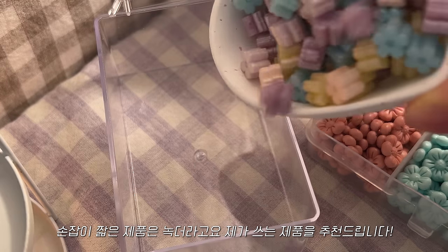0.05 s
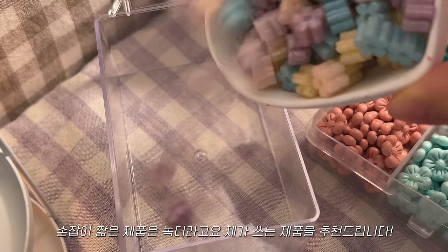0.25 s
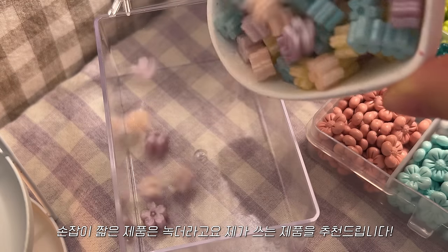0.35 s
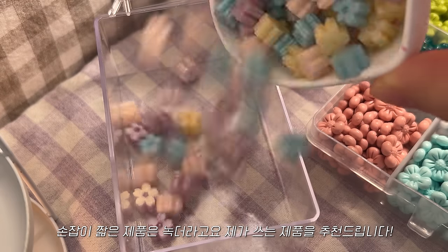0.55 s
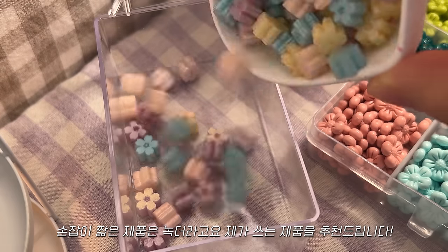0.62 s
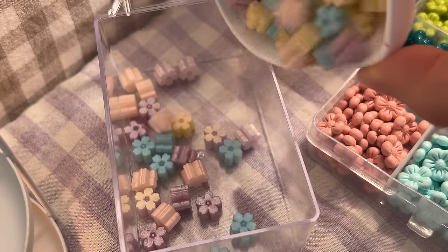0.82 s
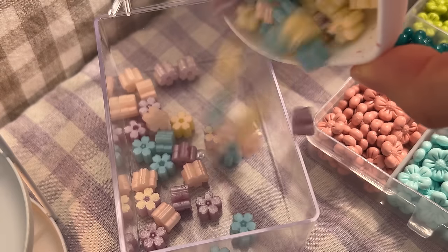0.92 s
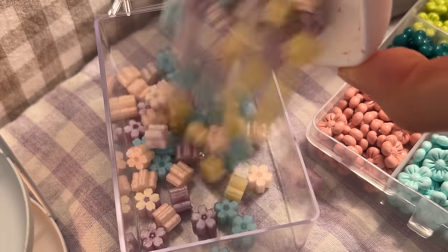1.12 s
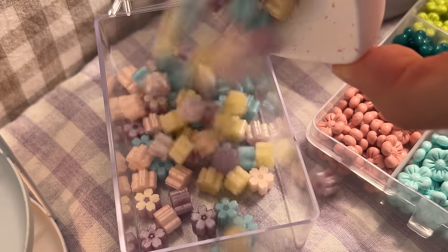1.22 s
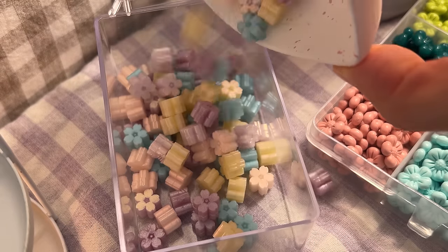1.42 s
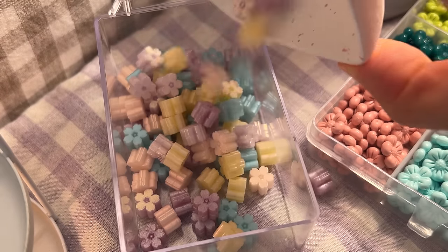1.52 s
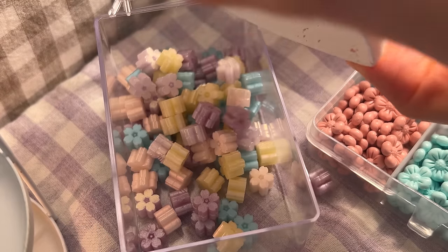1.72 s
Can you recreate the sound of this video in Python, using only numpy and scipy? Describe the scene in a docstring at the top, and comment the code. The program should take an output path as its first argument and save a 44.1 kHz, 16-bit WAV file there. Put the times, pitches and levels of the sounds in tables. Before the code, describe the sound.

Hard wax beads pour from a bowl into a plastic tray in two bursts, ticking against each other and making the tray ring briefly, until the last ones settle. The microphone is close and the room quiet.

```python
"""Small hard wax beads slip faintly in a tilting bowl, in a still room. At 0.2 s they pour into a thin
plastic tray on a cloth: some knock together in short bright ticks, others hit the bare tray and make it
ring. The heap jostles, the tray thuds softly on the cloth, and clumps flex its floor with hollow knocks.
A second pour follows at 0.9 s and thins out until the last beads settle.
A close pair of microphone ports hears it all."""
import sys
import numpy as np
from scipy import signal
from scipy.fft import rfft, irfft, next_fast_len
from scipy.io import wavfile
from scipy.ndimage import uniform_filter1d, minimum_filter1d

SR = 44100
rng = np.random.default_rng(int(sys.argv[2]) if len(sys.argv) > 2 else 0)


def transcribe(signal):
    """Save signal, clipped to [-1, 1], as a 16-bit WAV file at the path in sys.argv[1]."""
    frames = np.atleast_2d(signal).T
    limited = np.clip(frames, -1, 1)
    pcm = np.round(limited * 32767).astype(np.int16)
    wavfile.write(sys.argv[1], SR, pcm)


N = 77175
HIT_SAMPLES = 6144
HIT_T = np.arange(HIT_SAMPLES) / SR
POUR_START_S = .22


def from_db(db):
    """Decibels to gain."""
    return 10 ** (np.asarray(db) / 20)


def rms_one(x):
    """Scale to an rms of 1."""
    return x / np.sqrt(np.mean(x ** 2) + 1e-20)


def attack_one(x):
    """Scale the first few milliseconds to an rms of 1."""
    return x / np.sqrt(np.mean(x[:200] ** 2) + 1e-20)


def at_time(rows, s):
    """Read a curve at given times."""
    return np.interp(s, *np.transpose(rows))


def at_hz(rows, hz):
    """Read a curve on a log-frequency axis."""
    f, value = np.transpose(rows)
    return np.interp(np.log(hz + 1e-6), np.log(f), value)


def dying(t60):
    """Decay envelope that falls 60 dB in t60 seconds."""
    return from_db(-60 * HIT_T / t60)


def add(out, s, sound):
    """Mix a sound in at a given time."""
    i = int(np.clip(s * SR, 0, N - 1))
    out[..., i:i + sound.shape[-1]] += sound[..., :N - i]


def causal_response(curve):
    """Minimum-phase frequency response of an EQ curve."""
    cepstrum = irfft(np.log(from_db(at_hz(curve, np.fft.rfftfreq(HIT_SAMPLES, 1 / SR)))))
    cepstrum[1:HIT_SAMPLES // 2] *= 2
    cepstrum[HIT_SAMPLES // 2 + 1:] = 0
    return np.exp(rfft(cepstrum))


def ringing(hz, gain, t60):
    """Damped sines of random strength that build up within a cycle or two."""
    strength = gain * rng.random(len(hz)) * rng.choice([-1, 1], len(hz))
    cycles = np.outer(hz, HIT_T)
    decay = np.exp(-np.minimum(np.log(1000) / t60 * HIT_T, 20))
    rise = 1 - np.exp(-np.minimum(cycles, 10))
    return strength @ (np.sin(2 * np.pi * cycles) * decay * rise)


# Room tone EQ. Each row: frequency in Hz, relative gain in dB.
AIR_EQ = [(30, -21), (15000, -26)]


def air():
    """Faint noise of the still room."""
    colour = from_db(at_hz(AIR_EQ, np.fft.rfftfreq(N, 1 / SR)))
    return from_db(-73) * rms_one(irfft(rfft(rng.standard_normal((2, N))) * colour, N))


# Beads shifting in the bowl. Each row: start in seconds, level in dB.
BOWL_SHIFTS = [(.063, -46), (.09, -56), (.146, -46)]


def bowl_shifts(modes_hz=(2560, 4430), t60=.022, rustle_db=-65):
    """Beads slip in the tilting bowl with faint, dull clinks and a rustle of tiny ticks."""
    out = np.zeros(N)
    band = signal.butter(3, [2200, 4900], "band", fs=SR)
    slips = [(s, rustle_db + rng.normal(0, .84)) for s in rng.uniform(0, POUR_START_S, size=14)]
    for s, db in list(BOWL_SHIFTS) + slips:
        tick = attack_one(rng.standard_normal(HIT_SAMPLES) * dying(t60))
        ring = attack_one(ringing(modes_hz, 1, t60))
        add(out, s, from_db(db) * attack_one(signal.lfilter(*band, tick + .5 * ring)))
    return out


# EQ of a contact's crack. Each row: frequency in Hz, relative gain in dB.
CRACK_EQ = [(150, -27), (700, -21), (1150, -15), (1550, 1), (2500, 4), (3200, -6), (5000, -1.5), (7600, 0),
            (10000, -8.5), (12400, -16.5), (16000, -20.5)]
CRACK_RESPONSE = causal_response(CRACK_EQ)


def crack(t60=.011, snap_db=15.5, tumble_s=.0014):
    """A bead snaps down and touches twice more with other corners, over a duller noise tail."""
    burst = dying(t60 * np.exp(.46 * rng.uniform(-2.9, 3)))
    touches = rng.standard_normal((3, HIT_SAMPLES)) * burst
    touches[:, 0] = from_db(snap_db)
    tail = from_db(-17.5) * rng.standard_normal(HIT_SAMPLES) * dying(.091)
    force = touches[0] + signal.lfilter(*signal.butter(2, 5860, fs=SR), tail)
    for touch, lag in zip(touches[1:], np.cumsum(tumble_s * rng.uniform(.5, 2, 2))):
        force += from_db(-.5) * rng.random() * np.pad(touch, (int(lag * SR), 0))[:HIT_SAMPLES]
    return attack_one(irfft(rfft(force) * CRACK_RESPONSE))


# The tray's ringing modes. Each row: pitch in Hz, relative level in dB.
TRAY_MODES = [(1567, 0.5), (1721, -4), (2040, 1), (2296, -6), (2522, -3), (2785, -1.5), (4480, 7.5),
              (5750, -12.5), (6800, -7.5), (7690, -7)]
DETUNE = .011   # relative pitch scatter from hit to hit


def tray_ring(s, empty_t60_at_1khz=.2, damping_per_s=1):
    """The struck tray rings; high modes die sooner, and the growing heap damps them all."""
    mode_hz, mode_db = np.transpose(TRAY_MODES)
    hz = mode_hz * (1 + DETUNE * rng.standard_normal(len(mode_hz)))
    t60 = empty_t60_at_1khz * (hz / 1000) ** -.65 / (1 + damping_per_s * s)
    return attack_one(ringing(hz, from_db(mode_db), t60[:, None]))


def any_pitch():
    """Pitch of a contact on a chance spot, 1.6 to 8 kHz."""
    return 1600 * 5 ** rng.random()


def clack(hz, t60=.032):
    """A contact's own short pitch, plus four stray ones coloured like the crack."""
    main = attack_one(ringing([hz], 1, t60))
    stray_hz = np.array([any_pitch() for _ in range(4)])
    stray = attack_one(ringing(stray_hz, from_db(2 * at_hz(CRACK_EQ, stray_hz)), t60))
    return from_db(-5.5) * main + from_db(-6) * stray


# The tray floor's low modes. Each row: pitch in Hz, relative level in dB.
FLOOR_MODES = [(344, -31), (502, -43), (638, -23.5), (805, -18)]
FLOOR_HZ, FLOOR_DB = np.transpose(FLOOR_MODES)
FLOOR_T60_S = .24 * FLOOR_HZ[0] / FLOOR_HZ[:, None]   # all last the same number of cycles


def floor_ring(ring_db):
    """The tray floor gives a hit its low body."""
    hz = FLOOR_HZ * (1 + DETUNE * rng.standard_normal(len(FLOOR_HZ)))
    return ringing(hz, from_db(FLOOR_DB + ring_db), FLOOR_T60_S)


def contacts(rows, ring_db, trim_db=-3, crossover_hz=3410, attack_s=.00027):
    """Each contact layers crack, tray ring, clack and floor, panned to a chance spot on the tray."""
    out = np.zeros((2, N))
    low_pass, high_pass = (signal.butter(2, crossover_hz, kind, fs=SR) for kind in ("low", "high"))
    rise = 1 - np.exp(-HIT_T / attack_s)
    for s, db, treble_db, clack_hz in rows:
        hit = crack() + rise * (from_db(ring_db) * tray_ring(s) + clack(clack_hz))
        middle = attack_one(signal.lfilter(*low_pass, hit))
        treble = from_db(np.clip(treble_db, -10, 10)) * attack_one(signal.lfilter(*high_pass, hit))
        hit = attack_one(middle - treble) + floor_ring(ring_db)
        pan_db = rng.normal(0, 1.13) * np.array([[.5], [-.5]])
        add(out, s, from_db(db + trim_db + pan_db) * hit)
    return out


# Bead-on-bead ticks. Each row: start in seconds, relative level in dB.
BEAD_KNOCKS = [(0.2019, -30.5), (0.2144, -34), (0.2795, -21.5), (0.2899, -19), (0.3619, -3), (0.3768, -12),
               (0.493, -27), (0.563, -11), (0.5771, -10), (0.5912, -8), (0.6235, -8), (0.694, -19.5),
               (0.733, -26), (0.8308, -28.5), (0.8373, -20.5), (0.9563, -9), (0.9868, -11), (0.9933, -11),
               (1.0683, -14), (1.1438, -20), (1.235, -14.5), (1.3988, -21), (1.4312, -25.5), (1.5498, -36),
               (1.5683, -21), (1.585, -22.5), (1.6163, -31), (1.6459, -27.5), (1.6892, -40)]


def bead_knocks(treble_db=9):
    """Bead meets bead: a bright tick that hardly reaches the tray."""
    rows = [(s, db, rng.normal(treble_db, 2.5), any_pitch()) for s, db in BEAD_KNOCKS]
    return contacts(rows, ring_db=-13.5)


# Hits on the tray. Each row: start in seconds, relative level in dB,
# treble over middle in dB (held within 10 either way when played), clack pitch in Hz.
TRAY_LANDINGS = [(0.2209, -6.5, -8, 2540), (0.2583, -15, -15, 1830), (0.2949, -4, -2.5, 2430),
                 (0.3104, -4, 7, 5140), (0.3392, -10, -25, 1825), (0.3537, 0, 1, 2050),
                 (0.3903, -7.5, -3, 2453), (0.4369, -15.5, -4.5, 1960), (0.5035, -1, 5.5, 1578),
                 (0.5165, -7, 14, 2540), (0.5475, -12, -7, 1510), (0.5683, -6.5, 17, 1555),
                 (0.6123, -5.5, -14, 2674), (0.6356, -12, 10, 2050), (0.6719, -10.5, -6.5, 2610),
                 (0.7145, -13, 3.5, 1614), (0.7579, -21, 3, 1545), (0.9288, -5, 10, 2030),
                 (0.9636, -5, 12, 1725), (0.9806, -17.5, -12, 2660), (1.0232, -11.5, -6, 2480),
                 (1.0416, -8, 7, 2060), (1.0735, -9.5, 5.5, 1830), (1.0964, -14, 3, 1550),
                 (1.1675, -15, 4.5, 2680), (1.2039, -12.5, 3.5, 1570), (1.2465, -19.5, 15, 2495),
                 (1.261, -13.5, 2, 1940), (1.2909, -16.5, 7, 2710), (1.3186, -11, 17, 2850),
                 (1.4269, -26, -1, 2610), (1.4629, -28.5, 0, 1550), (1.4888, -25.5, -1.5, 1560),
                 (1.5772, -16.5, 2, 2338)]


def landings():
    """Beads land on the tray and set it ringing."""
    return contacts(TRAY_LANDINGS, ring_db=-4)


# Level curve of the jostling heap. Each row: time in seconds, relative level in dB.
HEAP_JOSTLE = [(.24, -56), (.35, -25.5), (.49, -32.5), (.58, -14), (0.768, -31), (.81, -45.5), (.92, -47),
               (.96, -23.5), (1.25, -18.5), (1.37, -39.5), (1.531, -43), (1.68, -38), (1.74, -65)]


def rebounds(per_s=195, spread_db=2.5):
    """Many small bounces at uneven times, as strong as the heap is stirred."""
    count = int(per_s * (N / SR - POUR_START_S))
    rows = []
    for s in POUR_START_S + (np.arange(count) + rng.uniform(0, 2, count)) / per_s:
        db = at_time(HEAP_JOSTLE, s) + rng.normal(-2, spread_db)
        rows.append((s, db, rng.normal(0, spread_db), any_pitch()))
    return contacts(rows, ring_db=-4.5)


# Low thumps under the heavy falls. Each row: start in seconds, level in dB.
TRAY_THUMPS = [(.3, -51.5), (.35, -41), (.525, -51), (.605, -45.5), (1.085, -48), (1.335, -49)]


def thud(centre_hz=69, rise_s=.016):
    """The whole tray bounces softly on the cloth after heavy falls and wobbles faintly under the rest."""
    out = np.zeros(N)
    wobbles = [(s, -43 + at_time(HEAP_JOSTLE, s) / 2) for s in rng.uniform(POUR_START_S, N / SR, 30)]
    swell = HIT_T / rise_s * np.exp(1 - HIT_T / rise_s)
    fade = 1 - (HIT_T / HIT_T[-1]) ** 2
    for s, db in list(TRAY_THUMPS) + wobbles:
        hz = centre_hz * np.exp(rng.normal(0, .16))
        add(out, s, from_db(db) * swell * fade * np.sin(2 * np.pi * hz * HIT_T))
    return out


# Clumps hitting the floor. Each row: start in seconds, level in dB, centre pitch in Hz.
FLOOR_FLEXES = [(0.346, -30, 490), (0.504, -35, 805), (.932, -30, 805), (0.937, -37.5, 344)]


def hollow_knocks(width_octaves=.05):
    """A clump flexes the tray floor: a rough, dull knock, strongest in the mode nearest its pitch."""
    out = np.zeros(N)
    band = signal.butter(2, [FLOOR_HZ[0] / 2, FLOOR_HZ[-1]], "band", fs=SR)
    modes = np.sin(2 * np.pi * FLOOR_HZ[:, None] * HIT_T) * dying(FLOOR_T60_S)
    rise = 1 - np.exp(-HIT_T * FLOOR_HZ[0])
    for s, db, centre_hz in FLOOR_FLEXES:
        weight = 1 / (1 + np.abs(np.log2(FLOOR_HZ / centre_hz)) / width_octaves)
        rough = rms_one(signal.lfilter(*band, rng.standard_normal(HIT_SAMPLES))) * dying(.12)
        add(out, s, from_db(db) * (weight @ modes + from_db(-19.5) * rough) * rise)
    return out


# Stereo phase. Each row: frequency in Hz, lead of the left port in radians.
LEFT_LEAD = [(200, 0), (650, 1.0), (1500, -.1), (4600, .65), (5800, -.4), (7200, 0), (8400, -1),
             (9900, -3.1), (13000, -6.1), (16000, -8.6)]
# Stereo balance. Each row: frequency in Hz, left over right in dB.
LEFT_BALANCE = [(150, 0), (700, 5), (1800, 0)]


def ports(x):
    """The two microphone ports differ in phase and level."""
    size = next_fast_len(N + HIT_SAMPLES)
    hz = np.fft.rfftfreq(size, 1 / SR)
    left = from_db(at_hz(LEFT_BALANCE, hz) / 2) * np.exp(.5j * at_hz(LEFT_LEAD, hz))
    return irfft(rfft(x, size) * np.array([left, 1 / left]), size)[:, :N]


def room(x, t60=.045, low_cut_hz=2200):
    """Short bright reflections from things nearby, different on each side."""
    echoes = rng.standard_normal((2, HIT_SAMPLES)) * dying(t60)
    echoes /= np.sqrt(np.sum(echoes ** 2, axis=1, keepdims=True))
    bright = signal.lfilter(*signal.butter(2, low_cut_hz, "high", fs=SR), x)
    return from_db(-16) * signal.fftconvolve(bright, echoes, axes=1)[:, :N]


def scene():
    """All the beads, close by, over the thud and the still room."""
    beads = bowl_shifts() + landings() + bead_knocks() + rebounds() + hollow_knocks()
    return ports(beads) + room(beads) + thud() + air()


def record(dry):
    """A fast limiter holds the loudest peaks at full scale, then the top end is cut."""
    safe_gain = 1 / np.maximum(np.abs(dry).max(axis=0), 1)
    gain = uniform_filter1d(minimum_filter1d(safe_gain, size=89), size=89)
    return signal.sosfilt(signal.cheby2(16, 70, 16800, fs=SR, output="sos"), dry * gain)


dry = scene()
out = record(dry)
transcribe(out)
```